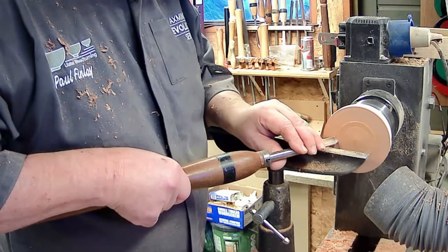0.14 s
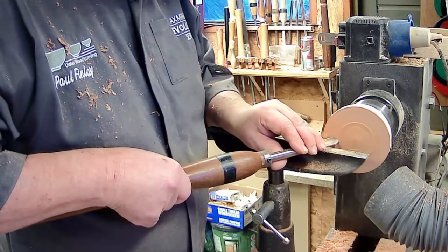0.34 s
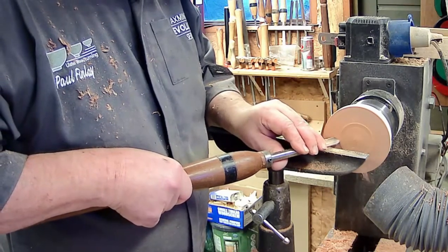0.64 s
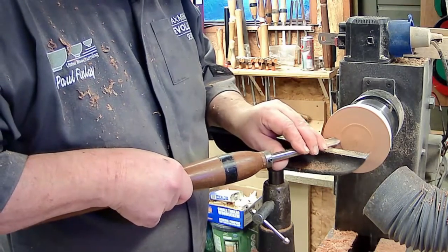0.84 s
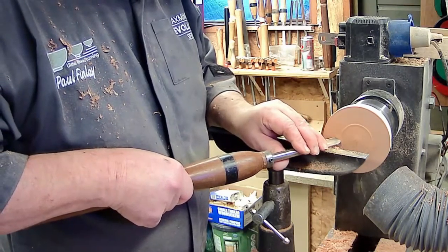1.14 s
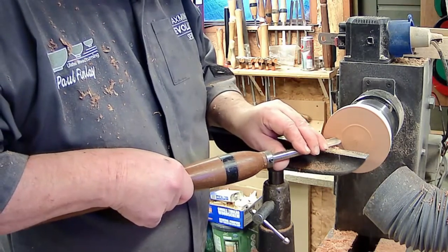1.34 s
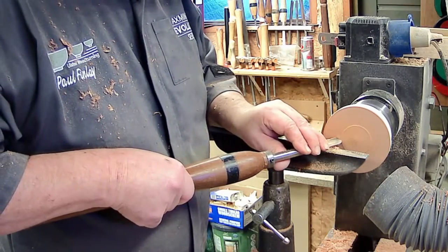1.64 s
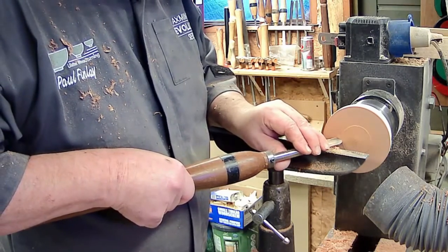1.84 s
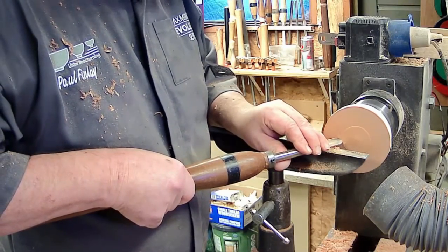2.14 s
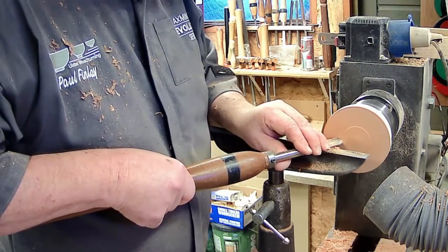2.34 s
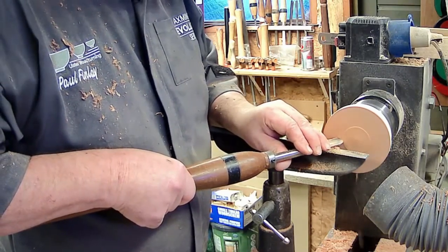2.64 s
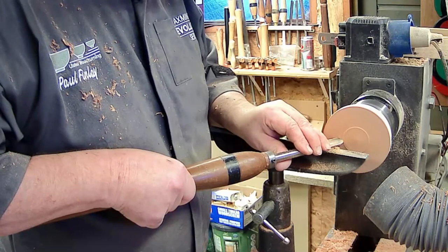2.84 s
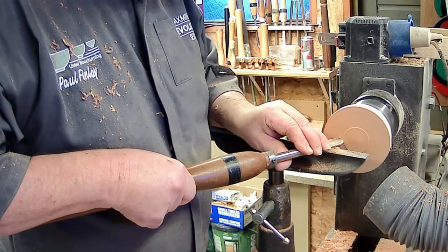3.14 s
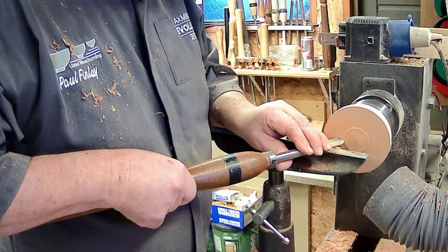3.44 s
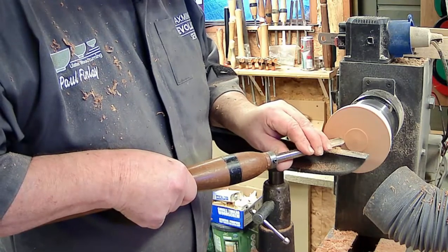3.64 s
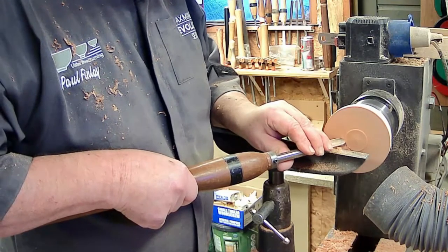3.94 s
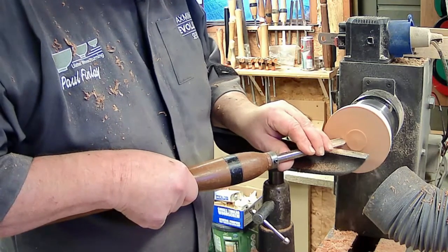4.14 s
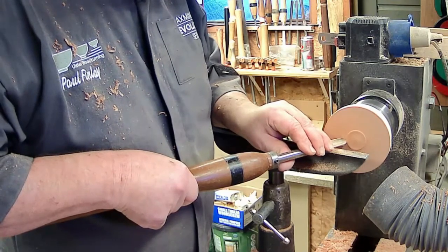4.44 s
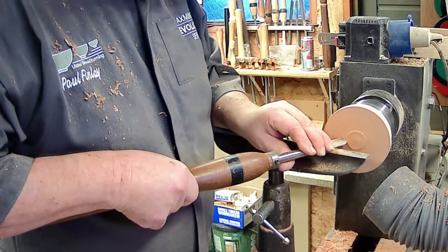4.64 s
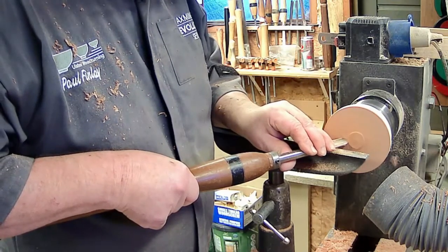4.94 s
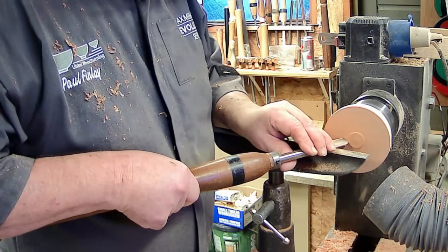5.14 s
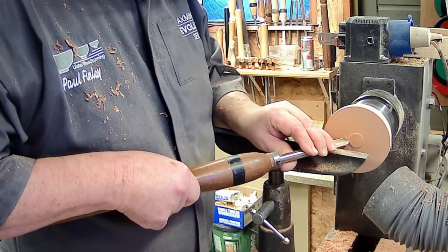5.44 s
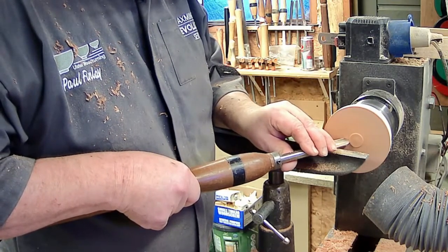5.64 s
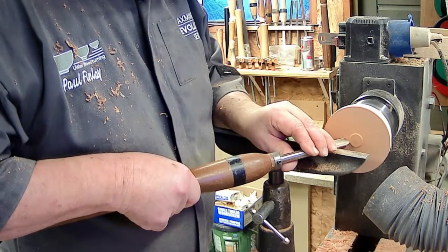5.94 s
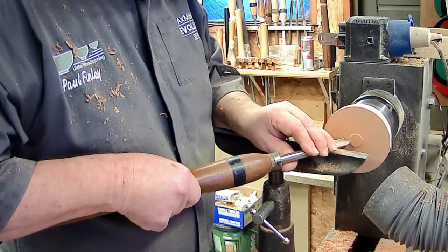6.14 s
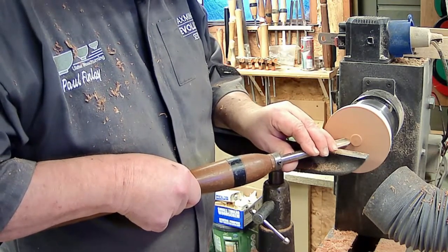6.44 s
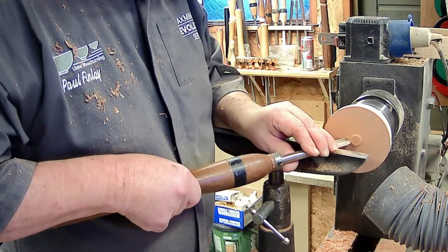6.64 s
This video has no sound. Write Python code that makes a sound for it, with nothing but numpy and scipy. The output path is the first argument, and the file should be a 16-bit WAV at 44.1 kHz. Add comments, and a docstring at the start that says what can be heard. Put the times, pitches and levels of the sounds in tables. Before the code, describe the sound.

A steel gouge shaves spinning wood on a lathe, a fluttering, rasping hiss with brief metallic squeaks that gradually dulls and fades.

```python
"""A steel gouge shaves a wooden blank spinning on a lathe, over workshop noise, near a small microphone.
From the start fibres tear with a rasping hiss, as the edge meets its own marks each turn and the end
grain twice a turn; steel and blank ring at fixed pitches. At 0.84 s the level drops abruptly; then the
steel squeaks briefly over bouts of chatter. From 3.6 s the tool rest hums in bouts. The cut dulls as
the edge nears the centre, and at 6.55 s it catches a hard fibre."""
import sys
import numpy as np
from scipy import signal
from scipy.fft import irfft
from scipy.io import wavfile
from scipy.ndimage import uniform_filter1d

SR = 44100
rng = np.random.default_rng(int(sys.argv[2]) if len(sys.argv) > 2 else 0)


def wav_out(sig):
    """Save sig, one row per channel (or a flat mono array), as 16-bit PCM at SR to the path in sys.argv[1]."""
    wavfile.write(sys.argv[1], SR, np.round(np.clip(np.atleast_2d(sig).T, -1, 1) * 32767).astype(np.int16))


N = 299880
TIME = np.arange(N) / SR
TURNS_PER_S = 30.677


def gain_of(db):
    """Amplitude ratio of a level in decibels."""
    return 10 ** (np.asarray(db) / 20)


def unit_rms(x):
    """Normalisation to an rms of 1."""
    return x / np.sqrt(np.mean(x ** 2) + 1e-20)


def curve(rows, column=1):
    """Linear interpolation of a table column over time."""
    rows = np.asarray(rows)
    return np.interp(TIME, rows[:, 0], rows[:, column])


def bouts(rows, edge_s, sag_db=0):
    """Power summation: the joint gain of soft-ended bouts (start/s, length/s, level/dB)."""
    power = np.zeros(N)
    for start, length, db in rows:
        age = TIME - start
        shape = np.clip(np.minimum(age, length - age) / edge_s + .5, 0, 1)
        power += gain_of(db + sag_db * np.clip(age / length, 0, 1)) ** 2 * shape ** 4
    return np.sqrt(power)


def wavering(depth_db=1.5, smooth_s=.06):
    """Amplitude modulation: a slow random gain."""
    size = round(smooth_s * SR)
    drift = uniform_filter1d(uniform_filter1d(rng.standard_normal(N), size), size)
    return gain_of(depth_db * unit_rms(drift))


def coloured(x, spectrum, modes=()):
    """Minimum-phase filtering by a broad spectrum with resonance peaks; the result has rms 1."""
    hz = np.fft.rfftfreq(8192, 1 / SR)
    knots_hz, knots_db = np.transpose(spectrum)
    db = np.interp(np.log(hz + 1), np.log(knots_hz + 1), knots_db)
    for centre_hz, width, lift_db in modes:
        db += lift_db / (1 + (2 * (hz - centre_hz) / width) ** 2)
    log_gain = np.log(gain_of(np.maximum(db, -110)))
    mirrored = np.r_[log_gain, log_gain[-2:0:-1]]
    response = np.exp(np.conj(signal.hilbert(mirrored)))
    taps = np.fft.ifft(response).real[:4096]
    return unit_rms(signal.oaconvolve(x, taps)[:N])


def resonance(force, hz, width_hz, steady):
    """Forced vibration of a double-pole resonator; steady (0-1) evens out swells, as friction does."""
    pole = np.exp((2j * np.pi * hz - np.pi * width_hz) / SR)
    ring = unit_rms(signal.lfilter([1, 0, -1], np.poly([pole, pole]), force).real)
    power = uniform_filter1d(ring ** 2, round(SR / TURNS_PER_S))
    return unit_rms(ring / (power + .05) ** (steady / 2))


# spectrum of the background noise: f/Hz, relative level/dB
BACKGROUND_SPECTRUM = [(15, -31.5), (40, -21), (100, -23), (260, -23.5), (370, -18.5), (450, -19.5),
                       (620, -20.5), (780, -17), (1250, -6), (1600, -27.5), (2200, -45), (3300, -68.5)]
# course of the background noise: t/s, level/dB
BACKGROUND_LEVEL = [(0, -63), (4.1, -63.5), (5, -59.5), (5.6, -65), (6.2, -66.5), (6.8, -63)]
# soft bumps: t/s, length/s, level/dB
THUDS = [(4.012, .03, -70), (4.068, 0.05, -67), (4.13, 0.11, -73)]
def workshop():
    """Filtered noise: a background strongest near 1250 Hz, and a few heavily damped low bumps."""
    background = coloured(rng.standard_normal(N), BACKGROUND_SPECTRUM) * gain_of(curve(BACKGROUND_LEVEL))
    thud = resonance(rng.standard_normal(N), hz=120, width_hz=110, steady=.8)
    return background + thud * bouts(THUDS, edge_s=.014)


# faint tones, likely the drive: f/Hz, level/dB
MOTOR_TONES = [(523, -82), (768, -78.5)]
def motor():
    """Narrow-band noise is heard as slightly wavering tones."""
    noise = rng.standard_normal(N)
    return sum(gain_of(db) * resonance(noise, hz, width_hz=8.6, steady=.36) for hz, db in MOTOR_TONES)


def recut(kept):
    """Regeneration: a random spectrum for each turn keeps a share of the one before."""
    turns = rng.standard_normal(kept.shape + (2,)) @ [1, 1j]
    for k in range(1, len(turns)):
        turns[k] = kept[k] * turns[k - 1] + np.sqrt(1 - kept[k] ** 2) * turns[k]
    return turns


def unrolled(turns, points=4096):
    """Fourier synthesis: each turn's orders of rotation give the profile passing under the edge."""
    path = irfft(turns, points).ravel()
    return unit_rms(np.interp(TIME * TURNS_PER_S * points, np.arange(len(path)), path))


def roughness(kept):
    """Partly periodic excitation at one point of the tool: fine marks are cut away sooner."""
    hz = np.maximum(np.arange(640) * TURNS_PER_S, 1100)
    return unrolled(recut(kept ** ((hz / 2600) ** 1.04)))


# marks that survive one turn: t/s, share at 2600 Hz
SURVIVING_MARKS = [(0, 0.54), (1.2, 0.64), (2.1, 0.79), (2.9, 0.94), (3.3, 0.47), (4.4, 0.47), (5.3, 0.48),
                   (5.9, 0.49), (6.3, 0.45), (6.8, .6)]
# grain round the blank: cycles per turn, peak position/turns, swing/dB at contrast 1
GRAIN = [(1, .3, 1.1), (2, .078, 2.7), (3, .12, .5), (4, .03, 1.0), (6, .03, .4), (8, .03, .15)]
# grain contrast, which deepens and sharpens the rasp: t/s, factor
GRAIN_CONTRAST = [(0, .8), (.8, .8), (1, 1.05), (1.5, 1.15), (2, 1.35), (3, 1.3), (3.9, 1.05), (4.2, .75),
                  (5.2, .72), (6.8, .85)]
def surface():
    """Excitation by rotation: roughness at edge and bevel, and the swell from grain and hard patches."""
    turn_starts = np.arange(int(N / SR * TURNS_PER_S) + 2) / TURNS_PER_S
    kept = np.interp(turn_starts, *np.transpose(SURVIVING_MARKS))[:, None]
    orders = np.arange(1, 40)
    patches = recut(np.tile(kept ** .5, len(orders))) / orders ** .42
    patches_db = 1.25 * unrolled(np.pad(patches, ((0, 0), (1, 0))))  # order 0 stays empty
    contrast = curve(GRAIN_CONTRAST)
    grain_db = sum(db * contrast ** (order / 2) * np.cos(2 * np.pi * order * (TIME * TURNS_PER_S - peak))
                   for order, peak, db in GRAIN)
    return roughness(kept), roughness(kept), grain_db + patches_db


# bouts of hum: t/s, length/s, level/dB
REST_BOUTS = [(3.6, 0.14, -76), (3.9, 0.097, -71.5), (4.172, 0.091, -62.5), (4.3, .12, -65.5),
              (4.63, 0.14, -63), (4.73, 0.11, -60), (4.87, .1, -68), (5.01, 0.07, -63.5),
              (5.2, 0.137, -62.5), (5.33, .12, -73), (5.69, .14, -73), (6.446, 0.096, -65),
              (6.53, 0.059, -68), (6.634, .116, -73)]
# faint hum between bouts: t/s, level/dB
REST_IDLE = [(0, -83), (3.3, -95), (3.5, -82), (6.8, -80.5)]
def tool_rest(bevel):
    """Forced resonance: the rubbing bevel drives one lightly damped mode of the rest."""
    level = np.hypot(bouts(REST_BOUTS, edge_s=.043, sag_db=-2.5), gain_of(curve(REST_IDLE)))
    return resonance(bevel, hz=363, width_hz=11, steady=.9) * level * wavering()


# modes of the gouge, two that chatter and then three that squeak: f/Hz, width/Hz
STEEL_MODES = [(1813.4, 53), (1733.5, 143), (2730, 130), (3069, 68), (3786, 146)]
# bouts of chatter: t/s, length/s, upper mode level/dB, lower mode level/dB
CHATTER_BOUTS = [(0, 0.16, -51, -51), (0.192, 0.26, -54, -53), (0.357, 0.33, -52.5, -57),
                 (0.633, 0.15, -66, -64.5), (0.898, 0.1, -47, -47), (1.008, 0.24, -43, -43.5),
                 (1.215, 0.29, -40.5, -43.5), (1.491, 0.35, -43, -43), (1.93, 0.23, -48.5, -44.5),
                 (2.204, 0.21, -46, -57), (2.408, 0.28, -38.5, -53), (2.7, 0.2, -63.5, -42),
                 (3.137, 0.19, -42.5, -50.5), (3.308, 0.16, -43, -41.5), (3.55, 0.14, -41.5, -50),
                 (3.8, 0.12, -38, -49), (3.966, .37, -39.5, -42), (4.334, .5, -38, -53),
                 (4.95, 0.067, -45, -48), (5.192, 0.16, -44.5, -53), (5.404, .16, -41, -61),
                 (5.629, 0.18, -41, -59), (5.854, .23, -42, -47.5), (6.205, 0.086, -39.5, -60),
                 (6.45, 0.092, -41, -50)]
# both modes between bouts: t/s, level/dB
CHATTER_IDLE = [(0, -59.5), (3, -47), (4.8, -47), (5.1, -53), (6.8, -55)]
def gouge_chatter(force):
    """Friction-driven vibration: the two lowest modes of the steel swell in bouts."""
    idle = gain_of(curve(CHATTER_IDLE))
    out = np.zeros(N)
    for k, (hz, width) in enumerate(STEEL_MODES[:2]):
        chatter = bouts([(start, length, db[k]) for start, length, *db in CHATTER_BOUTS], edge_s=.06)
        out += resonance(force, hz, width, steady=.8) * np.hypot(chatter, idle) * wavering()
    return out


# sustained ringing under the hiss: t/s, level/dB of each of the three higher modes
RING_LEVELS = [(0, -48, -52.5, -52), (1.2, -52.5, -49.5, -53), (1.9, -49, -51, -56), (2.3, -54, -55.5, -60),
               (2.8, -50.5, -48.5, -50.5), (3.3, -51, -57.5, -48), (4.3, -48.5, -60, -47),
               (4.75, -55, -59, -49.5), (4.9, -44, -54, -50), (5.2, -52, -54, -56.5),
               (5.6, -48, -52.5, -54), (6.8, -55, -57, -60.5)]
# squeaks: t/s, length/s, f/Hz of the mode, level/dB
SQUEAKS = [(0.862, 0.075, 3069, -41), (0.885, .05, 2730, -49), (0.947, .056, 3786, -36.5),
           (1.04, .032, 2730, -37), (1.104, .09, 3786, -35.5), (1.178, .06, 2730, -39.5),
           (1.18, 0.1, 3069, -47.5), (1.364, .074, 3069, -41), (1.36, 0.061, 3786, -40.5),
           (1.711, .05, 3069, -42), (1.711, 0.054, 2730, -41), (1.887, .12, 2730, -48.5),
           (2.595, 0.075, 3786, -42.5), (2.61, 0.1, 3069, -44.5), (2.87, .15, 2730, -47.5),
           (3.056, .13, 3069, -44.5), (3.862, .086, 2730, -48), (3.89, 0.052, 3786, -43.5),
           (4.128, 0.085, 3786, -39), (4.29, .058, 3786, -38.5), (4.349, 0.075, 2730, -42.5),
           (4.392, 0.12, 3786, -42), (5.616, 0.055, 3786, -45)]
def gouge_squeaks(force):
    """Friction-driven vibration: three higher modes of the steel ring on and flare briefly."""
    out = np.zeros(N)
    for column, (hz, width) in enumerate(STEEL_MODES[2:], start=1):
        squeaks = [(start, length, db) for start, length, mode_hz, db in SQUEAKS if mode_hz == hz]
        level = np.hypot(bouts(squeaks, edge_s=.045), gain_of(curve(RING_LEVELS, column)))
        out += resonance(force, hz, width, steady=.55) * level * wavering()
    return out


# path of the edge: t/s, position (0 rim, 1 centre), tilt of the hiss/(dB per octave)
TRAVEL = [(0, 0.07, 1.5), (.5, 0.2, 0), (.9, 0.26, -2.5), (1.4, 0, -0.5), (2.6, 0.55, 0.5), (3.1, 0.4, -1),
          (3.4, 0.34, -1.5), (3.8, 0.51, -4), (4.7, 0.65, -4), (5, 0.8, -4.5), (5.4, .95, -4.5), (6, 1, -5),
          (6.8, 1, -5.5)]
def travelling(force, spectrum, modes):
    """Modal weights depend on the driving point: a crossfade between rim, half way and centre."""
    position = curve(TRAVEL)
    out = np.zeros(N)
    for place in range(3):
        weight = np.maximum(1 - abs(2 * position - place), 0)
        out += weight * coloured(force, spectrum, [(hz, width, db[place]) for hz, width, *db in modes])
    return out


def tilted(force):
    """Spectral tilt: a slope pivoting on 4500 Hz brightens or dulls the force as the edge travels."""
    hz, times, spectra = signal.stft(force, SR, nperseg=256)
    octaves = np.log2(np.clip(hz, 1500, 11000) / 4500)[:, None]
    slope_db = np.interp(times, TIME, curve(TRAVEL, column=2))
    return signal.istft(spectra * gain_of(octaves * slope_db), SR, nperseg=256)[1][:N]


# broad response of the blank: f/Hz, relative level/dB
BLANK_SPECTRUM = [(200, -84), (420, -33), (600, -23.5), (800, -14.5), (1000, 1), (1400, -3.5), (2000, 0),
                  (2400, 6.5), (2800, -29.5), (4000, -37.5)]
# its modes: f/Hz, width/Hz, lift/dB at rim, half way and centre
BLANK_MODES = [(538, 23, 4.5, 15.5, 24), (722, 9.4, 17, 6.5, 1), (950, 28, 8.5, -10.5, 7.5),
               (1175, 40, -7.5, 3, 8.5), (1277, 150, -14, 10.5, 7.5), (1542, 123, 21, 20.5, 18),
               (2028, 100, 10.5, 16, 15.5), (2095, 44, 2.5, 10.5, 2)]
def blank(force):
    """Forced vibration: the cutting force shakes the modes of the wood."""
    return travelling(force, BLANK_SPECTRUM, BLANK_MODES)


# spectrum of the hiss: f/Hz, relative level/dB
TEAR_SPECTRUM = [(300, -89.5), (1000, -34), (1500, -8.5), (2450, -15), (2900, -9), (3500, -3.5), (4600, -2),
                 (5400, -1), (6000, -6), (6900, -4.5), (9000, -6), (15500, -14)]
# resonances in the hiss: f/Hz, width/Hz, lift/dB at rim, half way and centre
TEAR_MODES = [(3360, 90, 1.5, 6, 4), (4360, 260, 10, 7, 3), (4860, 220, 7, 8, 3), (5150, 220, 1.5, 2.5, 6),
              (5580, 120, 1.5, 4, 5), (6620, 400, 5, 5, 2.5), (7080, 250, 3, 2.5, 3),
              (10700, 800, 10, 10, 10), (12700, 400, 5, 5, 5), (14600, 900, 9, 9, 9)]
# the edge catches a hard fibre: t/s, lift/dB
CATCHES = [(6.5545, 13)]
def tearing_fibres(force):
    """Fracture noise: fibres tear with a broadband hiss, and a catch adds a short burst."""
    burst_db = sum(db * np.exp(-((TIME - start - .001) / .0015) ** 2) for start, db in CATCHES)
    return travelling(tilted(force * gain_of(burst_db)), TEAR_SPECTRUM, TEAR_MODES)


# course of the cut: t/s, fibre level/dB, blank level/dB
CUT_LEVELS = [(0, -30.5, -59), (.42, -30.5, -51.5), (.6, -32, -52.5), (1.2, -32, -55.5), (1.75, -34, -54.5),
              (2.14, -35.5, -56), (2.4, -33.5, -48), (3.05, -34.5, -57), (3.2, -34.5, -47.5),
              (3.7, -33.5, -44.5), (4.2, -33.5, -41), (4.73, -36, -40.5), (4.86, -37, -45),
              (5.5, -38, -46.5), (5.9, -39.5, -46.5), (6.3, -40.5, -50.5), (6.8, -43, -53)]
def cutting():
    """Source and filter: the edge drives fibres and blank, the rubbing bevel drives rest and steel."""
    edge, bevel, swell_db = surface()
    swell = gain_of(swell_db)
    soft_swell = gain_of(.24 * swell_db)  # the heavy parts feel the grain less
    metal = tool_rest(bevel) + gouge_chatter(bevel * soft_swell) + gouge_squeaks(bevel * swell)
    wood = blank(edge * soft_swell) * gain_of(curve(CUT_LEVELS, column=2))
    fibres = tearing_fibres(edge * swell) * gain_of(curve(CUT_LEVELS, column=1))
    return metal + wood + fibres


def scene():
    """Superposition at one point; cut and workshop start louder, then drop abruptly."""
    drop_s, drop_span_s, drop_db = .841, .006, 9.3
    before_drop = np.clip((drop_s - TIME) / drop_span_s + .5, 0, 1)
    return ((cutting() + workshop()) * gain_of(drop_db * before_drop) + motor())[None]


# response of the microphone: f/Hz, relative level/dB
MICROPHONE = [(20, -6), (7000, -3), (7600, -13), (8600, -26.5), (9600, -38), (11800, -41.5), (13700, -46),
              (15000, -43.5), (15700, -46.5)]
# its self-noise: f/Hz, relative level/dB
SELF_NOISE = [(20, -7), (3000, -13), (9000, -6), (12000, -1), (16000, -6.5)]
def record(dry):
    """Transduction: the microphone dulls the treble and adds faint hiss; a low-pass limits the band."""
    heard = coloured(dry[0], MICROPHONE) * np.std(dry)
    hiss = gain_of(-91) * coloured(rng.standard_normal(N), SELF_NOISE)
    low_pass = signal.firwin(511, 15700, window=("kaiser", 9), fs=SR)
    return signal.oaconvolve(heard + hiss, low_pass, "same")[None]


dry = scene()
out = record(dry)
wav_out(out)
```